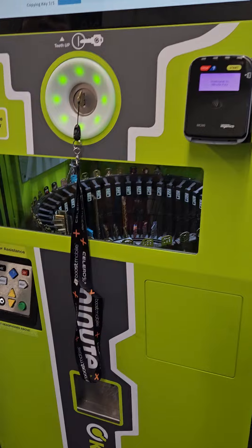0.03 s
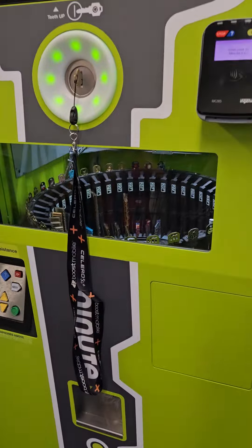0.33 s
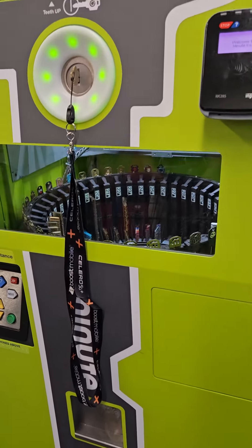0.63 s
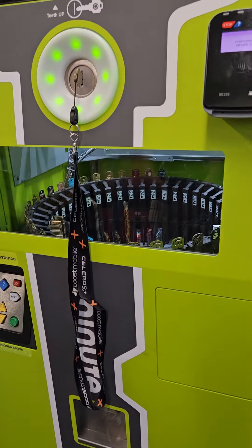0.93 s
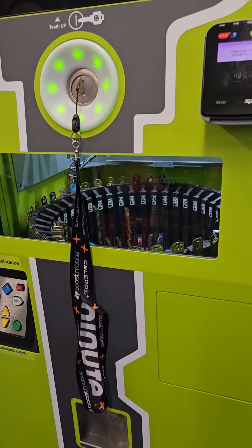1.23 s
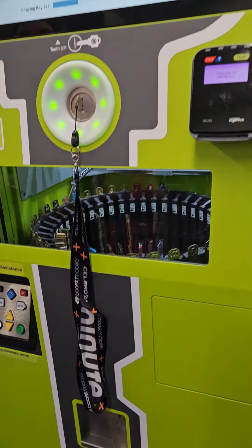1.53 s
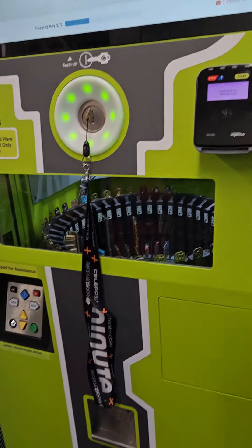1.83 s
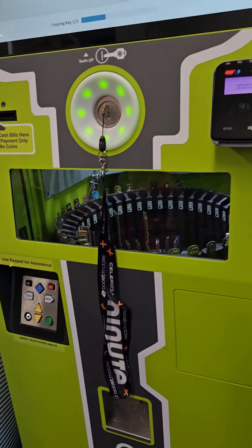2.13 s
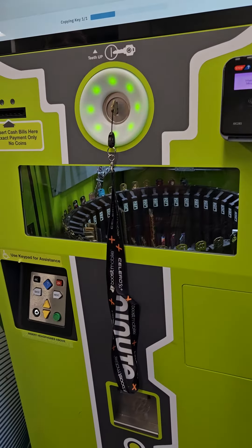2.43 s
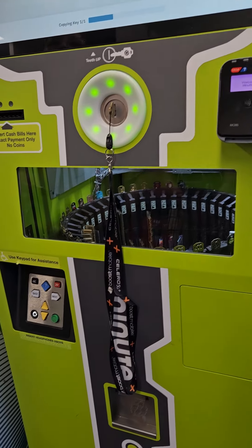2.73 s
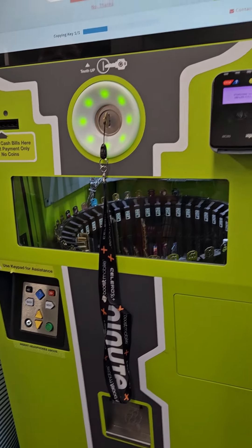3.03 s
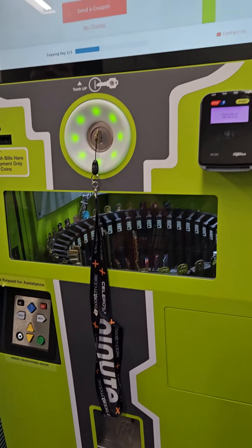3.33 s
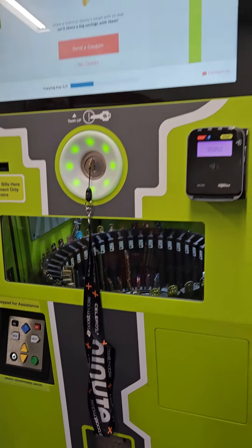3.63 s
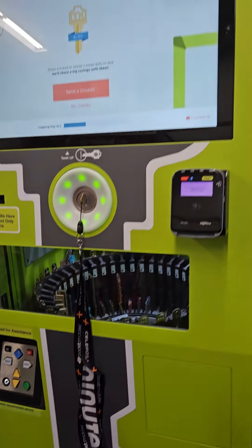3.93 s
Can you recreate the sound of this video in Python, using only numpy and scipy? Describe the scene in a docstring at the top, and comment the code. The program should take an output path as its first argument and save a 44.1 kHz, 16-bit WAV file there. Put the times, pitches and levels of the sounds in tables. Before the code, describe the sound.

Key cutting kiosk running with a steady motor whine, air rush and high metallic squeal.

```python
"""A key cutting kiosk runs in a shop, heard from an arm's length in front of it.
From the start a suction motor whines over a bed of rushing air that rings the cabinet, while a drive
sings near 2 kHz and the mains hum. The cutter rubs the key in thin, very high squeals that pulse once
a turn. They ease off around one second and build again; near three seconds the wheel bites harder
and the main squeal takes the lead, creeping up in pitch and dropping back at the very end."""
import sys
import numpy as np
from scipy import signal
from scipy.fft import rfft, irfft
from scipy.io import wavfile
from scipy.ndimage import uniform_filter1d

SR = 44100
rng = np.random.default_rng(int(sys.argv[2]) if len(sys.argv) > 2 else 0)


def master_out(mix):
    """Clip the mix to full scale and print it as 16-bit PCM to the path in sys.argv[1]."""
    frames = np.transpose(np.atleast_2d(mix))
    ceiling = np.clip(frames, -1, 1)
    pcm = np.round(ceiling * 32767).astype(np.int16)
    wavfile.write(sys.argv[1], SR, pcm)


N = 176400

# tone of the air bed and shop rumble: f/Hz, density/dB
AIR_SPECTRUM = [(15, -87), (28, -62), (60, -58), (105, -51.5), (135, -58.5), (185, -61.0), (330, -61.5),
                (520, -62.5), (780, -70), (865, -66), (960, -71), (1120, -61.5), (1600, -64.5),
                (1900, -58.5), (2300, -61.5), (2600, -65.5), (3100, -64), (4200, -62.5), (4850, -65),
                (5200, -72.5), (5900, -68.5), (7000, -70), (8400, -66), (9000, -71), (9500, -84),
                (10200, -75.5), (12600, -70), (14200, -77), (15700, -85.6)]
# cabinet and duct resonances that colour the air: f/Hz, width/Hz, lift/dB
CABINET_RESONANCES = [(271.5, 46.6, 11.5), (405, 17, -4.5), (1120, 66, -3), (1317, 38, 8), (1807, 29, 8.5),
                      (1960, 35, -7), (2183, 59, 5), (2780, 53, -2.5), (2963, 175, 5), (3280, 78, -3),
                      (3860, 96, 3.5), (4500, 58, 5), (4720, 130, 5), (5480, 107, 8), (6520, 90, 9),
                      (7390, 264, 10)]
# stereo lean of the air: f/Hz, left minus right/dB
AIR_PAN = [(60,1.2),(150,3.5),(300,-0.2),(800,0),(1300,-2.5),(2000,-4.5),(3000,-1.5),(4400,-8.5),(6000,-2),(8000,-10.5),(9200,-2),(10500,-7.5),(14000,-18)]
# ride on the hiss as the listener leans in and back: t/s, gain/dB
HISS_RIDE = [(0,-0.7),(.5,0.83),(1.5,0.03),(2.5,-.2),(3.2,-0.5),(4,-0.8)]
# contour of the deepest rumble, before DEEP_RIDE_DEPTH flattens it: t/s, relative level/dB
DEEP_RIDE = [(0.0, -52), (0.1, -39), (0.61, -40), (0.89, -54), (0.96, -36), (1.37, -37), (1.6, -30),
             (1.67, -44), (1.84, -39), (1.87, -51), (1.96, -34), (2.95, -37), (2.96, -38), (3.77, -48),
             (3.83, -38), (4.0, -42)]
# contour of the rumble between the deep end and the boom: t/s, relative level/dB
RUMBLE_RIDE = [(0,-31.5),(.25,-35.5),(.37,-32),(.45,-34.5),(.65,-31.5),(.8,-32),(.95,-33),(1.15,-35),(1.3,-33),(1.44,-37),(1.52,-34),(1.6,-35),(1.67,-34),
               (1.78,-33.5),(1.87,-34),(2.05,-33),(2.15,-36),(2.35,-34),(2.6,-36.5),(2.75,-33),(2.95,-34),(3.2,-35),(4,-35)]
# contour of the cabinet's boom: t/s, relative level/dB
BOOM_RIDE = [(0, -41), (0.2, -32), (0.45, -36.5), (0.66, -32), (0.77, -43.5), (0.95, -36.5), (1.07, -35.5),
             (1.2, -33), (1.45, -37), (2, -36.5), (2.13, -38.5), (2.27, -32), (2.55, -41.5), (2.76, -30.5),
             (3.15, -37), (3.4, -35), (3.8, -34.5), (4, -44)]
# ride on the rush just above the boom: t/s, gain/dB
LOW_RUSH_RIDE = [(0,0.5),(.9,0),(1.7,1),(2.3,-0.5),(2.85,1),(3.1,-3),(3.5,0),(4,-3)]
# short bumps in the cabinet's rumble: t/s, half length/s, f/Hz, pitch spread/Hz, level/dB
RUMBLE_SURGES = [(.655, .02, 265, 25, -32), (.95, .025, 255, 25, -32), (1.51, .025, 128, 15, -33),
                 (1.68, .055, 135, 15, -29.5), (1.78, .04, 135, 15, -32), (3.09, .04, 92, 10, -33)]
# panel rings kept going by the cutting: f/Hz, width/Hz, level/dB, left minus right/dB, peak t/s, lift/dB
PANEL_MODES = [(281.4,3.6,-45,-4,2.9,7), (357.2,6.1,-50,-5,0.34,0), (465,5.3,-49.5,9,2.9,2),
               (648,7.3,-48.5,1,1.8,6.5), (1044,11.4,-44.5,-1,3,4), (1172,10,-56,-4,3.2,12),
               (1302,9.3,-46,-1,0.78,8), (1780,10,-53,-4,.5,7), (1810,12,-45,-8,.95,4),
               (1920,7,-44,-5,3.14,11), (2070,37,-43,-2,1.8,6), (3165,17,-49.5,-1,1.5,5),
               (3886,17,-43.5,-6,0.36,5), (4520,25,-47.5,-5,2,10), (4680,17,-45,-8,1.04,11)]
# air-blown cabinet resonances: f/Hz, width/Hz, level/dB, left minus right/dB
AIR_WHISTLES = [(3878, 39, -42, -5), (4630, 52, -42.5, -1)]
# partials of the suction motor: multiple of the shaft rate, relative level/dB, left minus right/dB
MOTOR_HARMONICS = [(1, -42.5, 0), (2, -48.5, -3), (3, -46.5, 0), (6, -55, -2), (7, -42.5, -3), (8, -51, 1),
                   (9, -43, -8), (12, -45, -24), (18, -42, -17)]
# motor partials that swell as the listener moves, keyed by shaft multiple: t/s, lift/dB
HARMONIC_SWELLS = {3: [(0,2),(.4,2),(1.7,2),(2.2,7),(2.7,1.5),(3.1,8),(3.6,6),(4,-9)],
                   7: [(0,2.5),(.7,-2),(1.8,-3),(2.3,5),(2.7,-3),(3.2,4),(4,1)],
                   9: [(0,-1.5),(.45,4.5),(1.1,-5),(1.8,8.5),(2.3,-9),(3,1),(3.5,1),(4,-1)]}
# contour of the drive's tone: t/s, relative level/dB
DRIVE_RIDE = [(0,-39),(.2,-41),(.4,-35),(.54,-40),(.66,-32),(.9,-35),(1.1,-34.5),(1.28,-31),(1.38,-33.5),(1.46,-42),(1.75,-45),(2.1,-41),(2.45,-38.5),(2.6,-31.5),(2.75,-39),(2.82,-33),(2.95,-33),(3.1,-37.5),(3.3,-35),(3.65,-38),(4,-42)]
# pitch of the cutter's main squeal: t/s, f/Hz
MAIN_SQUEAL_PITCH = [(0,14630),(1,14660),(1.5,14640),(1.85,14580),(2.3,14620),(2.75,14590),(2.95,14635),(3.03,14725),(3.4,14740),(3.6,14810),(3.8,14840),(4,14925)]
# how hard the cutter bites, heard in the main squeal: t/s, relative level/dB
BITE_RIDE = [(0, -45), (1.1, -46), (1.25, -37), (1.6, -36), (1.85, -32.5), (2.2, -35), (2.55, -37.4),
             (2.7, -38), (2.78, -33), (2.95, -28.5), (3.15, -18.5), (3.29, -21.5), (3.48, -20),
             (3.6, -23.5), (3.85, -20.5), (4, -34)]
# contour of the squeal just above the main one: t/s, relative level/dB
UPPER_SQUEAL_RIDE = [(0,-56),(1.7,-52),(2,-45),(2.7,-45),(2.78,-31),(3.4,-41),(4,-42)]
# contour of the middle squeal: t/s, relative level/dB
MIDDLE_SQUEAL_RIDE = [(0,-31.5),(.5,-34.5),(.85,-50),(1.7,-55),(2,-38),(2.6,-34),(3.1,-34),(3.5,-42),(4,-52)]
# contour of the lowest squeal: t/s, relative level/dB
LOW_SQUEAL_RIDE = [(0,-56),(2.68,-53),(2.8,-43),(3.5,-35.5),(4,-42)]

LEFT_LAG_S = 0.00028
CENTRED_BASS_HZ, DIRECT_TOP_HZ = 560, 4970
DIRECT_SHARE, ECHO_SHARE, ECHO_GRAIN = 0.19, 0.35, 150  # shares of hiss power; fineness of the comb
BOOM_HZ, BOOM_WIDTH_HZ, DEEP_TOP_HZ, DEEP_RIDE_DEPTH = 287, 67, 87, 0.69
HISS_FLICKER_DB, RUMBLE_FLICKER_DB = 0.55, 0.5
PANEL_SWELL_S, WHISTLE_WANDER, WHISTLE_FADE_DB = 0.17, 0.004, 2
HUM_HZ, HUM_DB = 120, -40.5
SHAFT_HZ, SHAFT_WANDER, MOTOR_ROUGHNESS = 415.05, 0.00073, 0.25
MOTOR_TRIM_DB, MOTOR_FADE_DB, MOTOR_FADE_HZ = -0.5, 4, 3.8
DRIVE_HZ, DRIVE_WANDER, DRIVE_ROUGHNESS = 2015.5, 0.0013, 0.18
DRIVE_TRIM_DB, DRIVE_PAN_DB = 1, -9.5
MIDDLE_HZ, UPPER_HZ, LOW_RATIO = 13275, 14890, 0.804
SQUEAL_TRIM_DB, SQUEAL_PAN_DB, SKIRT_WIDTH_HZ, SKIRT_DB = 1, -7.5, 250, -8
TURN_HZ, FIRST_TURN_S, PULSE_SKEW = 26.6, 0.0032, 0.16
TOP_HZ = 15800


def undb(db):
    """Decibels to gain."""
    return 10 ** (np.asarray(db) / 20)


def curve(rows):
    """Breakpoints in time joined by straight lines."""
    return np.interp(np.arange(N) / SR, *np.array(rows, float).T)


def over_hz(rows, f):
    """Breakpoints joined on a log-frequency axis."""
    hz, value = np.array(rows, float).T
    return np.interp(np.log(f), np.log(hz), value)


def pan(db):
    """Left and right gains of unit mean power."""
    gains = np.array([undb(db / 2), undb(-db / 2)]).reshape(2, -1)
    return gains / np.sqrt(np.mean(gains ** 2, axis=0))


def walk(rate_hz):
    """Smooth random modulator of spread 1, moving at up to about rate_hz."""
    f = np.arange(N // 2 + 1) * SR / N
    y = irfft(rfft(rng.standard_normal(N)) / (1 + (f / rate_hz) ** 4), N)
    return (y - y.mean()) / y.std()


def scatter(rate_hz):
    """Complex modulator of mean power 2: smears a tone into a band of noise."""
    return walk(rate_hz) + 1j * walk(rate_hz)


def angle(hz):
    """Running phase of a moving frequency."""
    return 2 * np.pi * np.cumsum(hz * np.ones(N)) / SR


def unit_gain(db):
    """A level contour as a gain of unit mean power."""
    gain = undb(db)
    return gain / np.sqrt(np.mean(gain ** 2))


def steady(x, window_s=0.28):
    """Leveller: evens out the slow chance swells of noise at the same power."""
    power = uniform_filter1d(np.mean(x ** 2, axis=0), int(window_s * SR))
    return x * np.sqrt(power.mean() / power)


def noise_spectrum():
    """Spectrum of white noise with unit power per hertz."""
    return rfft(rng.standard_normal(N)) * np.sqrt(SR / 2)


def rumble(f, colour):
    """Low end of shop and cabinet: one noise for both ears, ridden in four bands."""
    low = colour * noise_spectrum()
    boom = 1 / (1 + (2 * (f - BOOM_HZ) / BOOM_WIDTH_HZ) ** 4)
    under = (1 - boom) * (f < BOOM_HZ)
    deep = 1 / (1 + (f / DEEP_TOP_HZ) ** 12)
    bands = [(under * deep, DEEP_RIDE_DEPTH * curve(DEEP_RIDE)),
             (under * (1 - deep), curve(RUMBLE_RIDE)),
             (boom, curve(BOOM_RIDE))]
    weight = sum(steady(irfft(low * band, N)) * unit_gain(db) for band, db in bands)
    low_rush = irfft(low * (1 - boom - under), N) * undb(curve(LOW_RUSH_RIDE))
    return weight + low_rush


def hiss(f, colour):
    """Top of the air: it arrives direct, by fixed reflections and as a diffuse wash."""
    direct_share = DIRECT_SHARE / (1 + (f / DIRECT_TOP_HZ) ** 4)
    lag = np.array([np.exp(-2j * np.pi * f * LEFT_LAG_S), np.ones(len(f))])
    comb = np.array([scatter(ECHO_GRAIN)[:len(f)] for _ in range(2)]) / np.sqrt(2)
    direct = np.sqrt(direct_share) * lag * noise_spectrum()
    reflected = np.sqrt(ECHO_SHARE) * comb * noise_spectrum()
    diffuse = np.sqrt(1 - direct_share - ECHO_SHARE) * np.array([noise_spectrum(), noise_spectrum()])
    return irfft(colour * (direct + reflected + diffuse), N)


def rushing_air():
    """The bed: air noise coloured by the cabinet, a wide hiss over a rumble, both flickering lightly."""
    f = np.maximum(np.arange(N // 2 + 1) * SR / N, 1)
    cabinet_db = sum(lift / (1 + (2 * (f - hz) / width) ** 2) for hz, width, lift in CABINET_RESONANCES)
    colour = undb(over_hz(AIR_SPECTRUM, f) + cabinet_db) * pan(over_hz(AIR_PAN, f))
    bass_share = 1 / (1 + (f / CENTRED_BASS_HZ) ** 3)
    highs = hiss(f, colour * np.sqrt(1 - bass_share))
    lows = rumble(f, colour * np.sqrt(bass_share))
    highs *= undb(curve(HISS_RIDE) + HISS_FLICKER_DB * walk(14.5))
    lows *= undb(RUMBLE_FLICKER_DB * walk(8.1))
    return highs + lows


def surges():
    """The cabinet's rumble bumps up for a moment at a low, unsteady pitch."""
    out, t = 0, np.arange(N) / SR
    for at_s, half_s, hz, spread_hz, db in RUMBLE_SURGES:
        envelope = np.sqrt(2) * undb(db) * np.exp(-((t - at_s) / half_s) ** 2)
        out += envelope * np.sin(angle(hz + spread_hz * walk(40)))
    return out


def panels():
    """Metal panels ring narrowly and restlessly, most blooming once; the right ear hears them first."""
    out, t = 0, np.arange(N) / SR
    for hz, width, db, pan_db, peak_s, lift_db in PANEL_MODES:
        ring = scatter(width) * np.exp(1j * angle(hz))
        lag = np.array([[np.exp(-2j * np.pi * hz * LEFT_LAG_S)], [1]])
        bloom_db = lift_db * np.exp(-((t - peak_s) / PANEL_SWELL_S) ** 2)
        out += np.real(ring * lag) * undb(db + bloom_db) * pan(pan_db)
    return out


def whistles():
    """Air blows cabinet resonances into breathy whistles that waver in pitch and strength."""
    out = 0
    for hz, width, db, pan_db in AIR_WHISTLES:
        breath = np.array([scatter(width) for _ in range(2)])
        phase = angle(hz * (1 + WHISTLE_WANDER * walk(2.5)))
        whistle = np.real(breath * np.exp(1j * phase))
        out += whistle * undb(db + WHISTLE_FADE_DB * walk(3.5)) * pan(pan_db)
    return out


def mains_hum():
    """A low electrical hum, dead centre, wavering in level."""
    return np.sqrt(2) * undb(HUM_DB + 2 * walk(5.6)) * np.sin(angle(HUM_HZ))


def suction_motor():
    """A whine of shaft harmonics, fading at each ear as the listener moves through standing waves."""
    shaft = angle(SHAFT_HZ * (1 + SHAFT_WANDER * walk(3.07)))
    out = 0
    for order, db, pan_db in MOTOR_HARMONICS:
        ears = []
        for _ in range(2):
            fade = undb(MOTOR_FADE_DB * walk(MOTOR_FADE_HZ))
            grit = 1 + MOTOR_ROUGHNESS * walk(34)
            ears.append(fade * grit * np.sin(order * shaft + 0.72 * walk(1.4)))
        lift_db = curve(HARMONIC_SWELLS[order]) if order in HARMONIC_SWELLS else 0
        out += np.sqrt(2) * undb(db + lift_db + MOTOR_TRIM_DB) * pan(pan_db) * np.array(ears)
    return out


def drive():
    """The cutter's drive sings one slightly rough tone, off to the right."""
    phase = angle(DRIVE_HZ * (1 + DRIVE_WANDER * walk(14.0)))
    ears = [np.sin(phase + 0.74 * walk(6.4)) * (1 + DRIVE_ROUGHNESS * walk(12)) for _ in range(2)]
    return np.sqrt(2) * np.array(ears) * undb(curve(DRIVE_RIDE) + DRIVE_TRIM_DB) * pan(DRIVE_PAN_DB)


def squeal(hz, width_hz, clean=0):
    """A rubbed resonance: a clean core drifting between the ears, a restless band, a scraping skirt."""
    core = np.sqrt(clean) * np.exp(1j * walk(32))
    ears = []
    for _ in range(2):
        drifting = core * np.exp(1j * walk(1.7))
        restless = np.sqrt(1 - clean) * scatter(width_hz)
        skirt = undb(SKIRT_DB) * scatter(SKIRT_WIDTH_HZ)
        ears.append(drifting + (restless + skirt) / np.sqrt(2))
    tone = np.real(np.array(ears) * np.exp(1j * angle(hz)))
    return tone / tone.std()


def wheel_pulse(depth_db):
    """Tremolo that jumps up once a turn of the wheel and falls back more slowly."""
    turn = 2 * np.pi * TURN_HZ * (np.arange(N) / SR - FIRST_TURN_S)
    return unit_gain(depth_db * (np.cos(turn) - PULSE_SKEW * np.sin(2 * turn)))


def cutter():
    """The lead: the wheel rubs the key hardest once a turn, so its four high squeals pulse together."""
    hz = curve(MAIN_SQUEAL_PITCH)
    main = undb(curve(BITE_RIDE)) * squeal(hz, width_hz=70, clean=0.55)
    middle = undb(curve(MIDDLE_SQUEAL_RIDE)) * squeal(MIDDLE_HZ, width_hz=53, clean=0.35)
    upper = undb(curve(UPPER_SQUEAL_RIDE)) * squeal(UPPER_HZ, width_hz=50)
    low = undb(curve(LOW_SQUEAL_RIDE)) * squeal(hz * LOW_RATIO, width_hz=94)
    pulsing = main * wheel_pulse(depth_db=3.9) + (middle + upper + low) * wheel_pulse(depth_db=2)
    return pulsing * undb(SQUEAL_TRIM_DB) * pan(SQUEAL_PAN_DB)


def scene():
    """The mix: air and cabinet as the bed, the machinery over it, the cutter on top."""
    bed = rushing_air() + surges() + panels() + whistles()
    return bed + suction_motor() + drive() + mains_hum() + cutter()


def record(dry):
    """A steep low-pass shaves off the very top."""
    return signal.sosfilt(signal.ellip(10, .1, 80, TOP_HZ, fs=SR, output="sos"), dry)


dry = scene()
out = record(dry)
master_out(out)
```